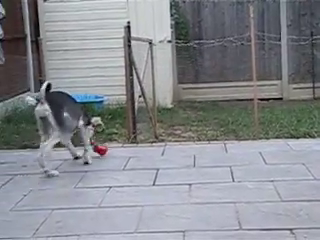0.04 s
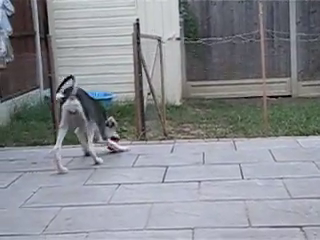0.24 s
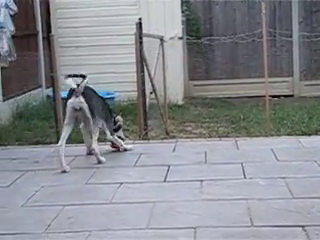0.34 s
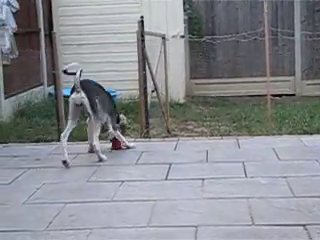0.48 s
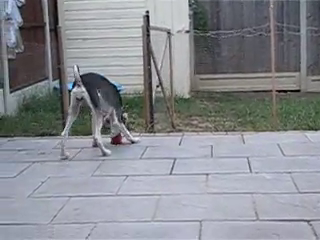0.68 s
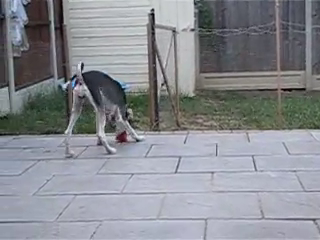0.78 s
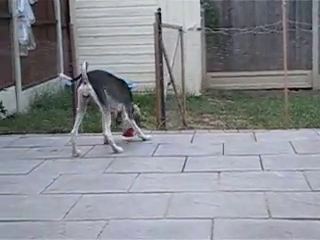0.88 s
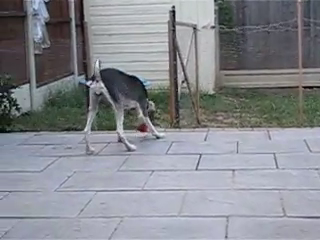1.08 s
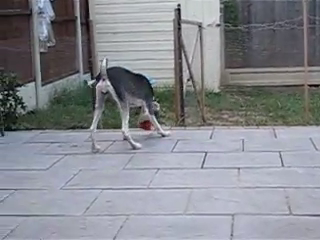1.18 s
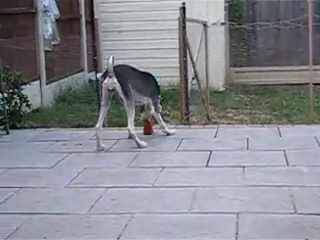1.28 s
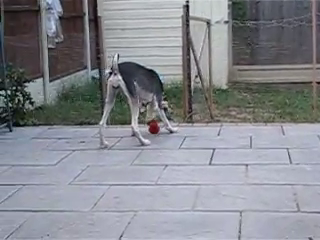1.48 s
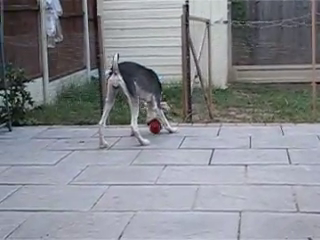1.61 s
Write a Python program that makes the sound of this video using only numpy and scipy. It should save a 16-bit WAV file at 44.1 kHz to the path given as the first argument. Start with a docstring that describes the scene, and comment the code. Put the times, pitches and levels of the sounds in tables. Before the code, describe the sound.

Hollow knocks and short scrapes of a plastic pot pushed over stone by a puppy.

```python
"""Over a quiet outdoor rumble, a distant hum and a camera's faint pulsing whine, a puppy knocks a small
plastic pot over on a paved patio. Each knock is a hollow pop with a crack; claws and grit tick, paws scuff.
Nosed along the slabs, the rim rasps and squeaks and the covered cavity hoots. The rumble swells once,
then at 1.3 s the dropped pot lands on its stiff base and bounces. Nearby walls and the yard answer."""
import sys
import numpy as np
from scipy import signal
from scipy.fft import rfft, irfft, next_fast_len
from scipy.io import wavfile

SR = 44100
rng = np.random.default_rng(int(sys.argv[2]) if len(sys.argv) > 2 else 0)


def file_out(sig):
    """Save sig as 16-bit WAV at sys.argv[1]."""
    # one column per channel
    cols = np.atleast_2d(sig).T
    # limit, then scale
    lim = np.clip(cols, -1, 1)
    pcm = np.round(lim * 32767).astype(np.int16)
    wavfile.write(sys.argv[1], SR, pcm)


N = 72765
T = np.arange(N) / SR
TOP_HZ = 15900

# knocks of the pot on stone; its pitch shifts as the slab or the muzzle covers its mouth
# (time [s], pop [dB], crack [dB], ring [dB], tilt of pop and ring [dB/octave], pitch [semitones])
POT_KNOCKS = [(0.1013, -29.5, -22, -28, 15, -0.39), (0.2299, -11.5, -13, -31, -7, 0.71),
              (0.2342, -19.5, -15.5, -24, 28, 2.26), (0.2379, -20, -15, -10, 12, 1.76),
              (0.2486, -4, -10.5, -5, -7, 0.24), (0.252, -2, -10, -5, -9.5, 0.015),
              (.2562, -6.5, -11, 3, -1.5, -0.081), (0.2614, -7, -11, 2, 1.5, -0.078),
              (.268, -27, -17, -15, -2, -0.07), (0.3606, -10.5, -19, -32, 4.5, -1.2),
              (.402, -23.5, -23.5, -12, 13, -0.34), (.4405, -25, -32, -16, 17, -1.17),
              (.476, -20, -28.5, -16, 7, 1.06), (0.5356, -16, -24.5, -12.5, 5, -0.22),
              (.61, -43, -25, -37, -3, -1.1), (.619, -28, -31, -42, 2, -1.1),
              (.6245, -16, -22, -26, -6, -0.31), (0.6508, -20, -15, -19.5, -10, -0.93),
              (.6722, -35, -19.5, -28, -1, -2), (1.2075, -34.5, -48, -51, 3, -0.37),
              (1.3101, -1, -14.5, -5, 0.5, -0.36), (1.3433, -9.5, -18, -8, 8.5, -0.17),
              (1.3735, -27, -49, -19, 1, 0.36), (1.3935, -15.5, -21.5, -18, 9, -0.33),
              (1.4122, -24, -22, -26, 18, -0.12), (1.4275, -30, -26, -34, 11, 1.1)]
# tone colour of the pot's cavity (frequency [Hz], level [dB])
CAVITY_COLOUR = [(60, -39.5), (200, -30.5), (410, -20), (510, -5), (620, -6), (740, 1), (950, -4.5),
                 (1170, 0), (1370, -23.5), (1700, -29.5), (2300, -46), (8000, -74)]
# tone colour of rubbing on stone (frequency [Hz], level [dB])
RASP_COLOUR = [(200, -10.5), (700, 3.5), (1700, 0), (3000, -1.5), (4300, -2.5), (5600, -7.5), (9000, -18),
               (15500, -34)]
# bright tone colour of claws and grit (frequency [Hz], level [dB])
TICK_COLOUR = [(400, -61), (2000, 0), (4000, 6), (8000, 2.5), (12500, 3.5), (15500, -6)]


def amp(db):
    return 10 ** (np.asarray(db) / 20)


def unit_rms(x):
    return x / np.sqrt(np.mean(x ** 2) + 1e-20)


def curve_at(points, hz):
    """Read (frequency, value) points along a log frequency axis."""
    freqs, values = np.transpose(points)
    return np.interp(np.log(hz + 1), np.log(freqs + 1), values)


def tilted(colour, tilt_db, low_hz, high_hz):
    """Lean a colour by tilt_db an octave between two frequencies."""
    return [(hz, db + tilt_db * np.log2(np.clip(hz, low_hz, high_hz) / low_hz)) for hz, db in colour]


def transposed(rows, semitones):
    """Move a colour or a set of modes in pitch."""
    return [(hz * 2 ** (semitones / 12), *rest) for hz, *rest in rows]


def filtered(x, response):
    """Filter x by a complex gain, given as a function of frequency."""
    size = next_fast_len(N + SR // 2)
    return irfft(rfft(x, size) * response(np.fft.rfftfreq(size, 1 / SR)), size)[..., :x.shape[-1]]


def impulse(colour, size=4096):
    """A minimum-phase pulse of peak 1 with the given colour."""
    cepstrum = irfft(np.log(amp(curve_at(colour, np.fft.rfftfreq(size, 1 / SR)))))
    cepstrum[1:size // 2] *= 2
    cepstrum[size // 2 + 1:] = 0
    pulse = irfft(np.exp(rfft(cepstrum)))
    return pulse / np.abs(pulse).max()


def coloured(pair, colour):
    """EQ two channels without pre-ringing."""
    return signal.fftconvolve(pair, impulse(colour)[None], axes=1)[:, :pair.shape[1]]


def spread(pair):
    """Two unrelated signals become left and right: alike in the bass, wide in the treble."""
    # likeness of left and right (frequency [Hz], correlation [0-1])
    likeness = [(100, 0.99), (700, 0.89), (1300, 0.65), (2500, 0.44), (5000, 0.017), (15000, 0.19)]
    angle = lambda hz: np.arccos(np.clip(curve_at(likeness, hz), -1, 1)) / 2
    mid, side = filtered(pair, lambda hz: np.array([np.cos(angle(hz)), np.sin(angle(hz))]))
    return np.array([mid + side, mid - side])


def add(out, start, x):
    """Mix x in at start seconds."""
    i = max(0, round(start * SR))
    out[:, i:i + x.shape[-1]] += x[..., :max(0, N - i)]


def stroke(start, length, attack_s=0.004, release_t60=0.053):
    """Envelope of a rub: quick attack, hold, release."""
    attack = np.clip((T - start) / attack_s, 0, 1)
    return attack * amp(-60 * np.maximum(T - start - length, 0) / release_t60)


def bump(start, length):
    """Envelope with a flat top and soft edges."""
    return np.exp(-(2 * (T - start) / length - 1) ** 4)


def wavering_tone(hz, width_hz):
    """Noise through one narrow resonance, rms 1."""
    return unit_rms(filtered(rng.standard_normal(N), lambda f: 1 / (1 + ((f - hz) / width_hz) ** 2)))


def friction(colour, scatter_db, slips_per_s=4000):
    """Dense tiny slips of uneven size, rms 1."""
    slips = (rng.random(N) < slips_per_s / SR) * amp(scatter_db * rng.standard_normal(N))
    return unit_rms(coloured(spread(slips * rng.standard_normal((2, N))), colour))


def snap(colour, t60, size=2048, side_db=-1):
    """A burst of noise dying in t60, with the energy of a brief pulse of height 1."""
    noise = spread(rng.standard_normal((2, size)) * amp([[0], [side_db]]))
    burst = coloured(noise * amp(-60 * np.arange(size) / SR / t60), colour)
    return 3.62 * burst / np.linalg.norm(burst)


def ringing(modes, tilt_db=0, pivot_hz=870):
    """Damped sines, struck a little differently each time; tilt_db makes the ring brighter or duller."""
    t = T[:SR // 4]
    return sum(amp(db + tilt_db * np.log2(hz / pivot_hz) + rng.normal(0, 1.6) - 60 * t / t60)
               * np.sin(2 * np.pi * hz * t) for hz, db, t60 in modes)


def outdoor_bed():
    """Outdoor rumble that swells once in the deep bass, and a distant hum."""
    # tone colour of the open air (frequency [Hz], level [dB])
    air_colour = [(15, -46), (25, -2), (133, -1.5), (361, -8), (620, -14.5), (1120, -12.5), (2090, -23),
                  (4100, -29), (8050, -32), (15800, -40.5)]
    air = filtered(spread(rng.standard_normal((2, N))), lambda hz: amp(curve_at(air_colour, hz)))
    swell = amp(-47.5) * bump(start=0.837, length=0.31) * wavering_tone(hz=56, width_hz=22)
    hum = amp(-53.5) * wavering_tone(hz=217.3, width_hz=6.3)
    return amp(-43) * unit_rms(air) + swell + hum


def camera_whine(hz=7890, pulse_hz=30, first_peak_s=0.0148):
    """The camera's thin whine pulses once a picture."""
    gate = np.clip(0.67 + 1.2 * np.cos(2 * np.pi * pulse_hz * (T - first_peak_s)), 0, 1)
    return amp(-62.5) * gate * unit_rms(np.sin(2 * np.pi * hz * T))


def rim_scrapes():
    """The dragged rim rasps on the slabs and rubs the cavity into sound; returns (rasp, rub)."""
    # drags of the rim (time [s], length [s], rasp [dB], hollow rub [dB], rasp tilt [dB/octave])
    drags = [(0, 0.0055, -36.5, -38, 4), (0.008, 0.063, -47, -51.5, 2), (0.225, 0.017, -31.5, -60, 5.5),
             (0.25, 0.016, -31, -19.5, 4), (0.274, 0.054, -53, -46, 9), (0.357, 0.0047, -36.5, -38, 2.5),
             (0.392, 0.006, -33.5, -40, 4.5), (0.426, 0.065, -48, -41.5, -0.5),
             (0.555, 0.082, -39, -47, -2), (0.644, 0.038, -34, -39, -3.5)]
    rasp, rub_envelope = np.zeros((2, N)), np.zeros(N)
    for start, length, rasp_db, rub_db, tilt_db in drags:
        colour = tilted(RASP_COLOUR, tilt_db, low_hz=1510, high_hz=12000)
        envelope = stroke(start, length)
        rasp += amp(rasp_db) * envelope * friction(colour, scatter_db=2.5)
        rub_envelope += amp(rub_db) * envelope
    return rasp, rub_envelope * friction(CAVITY_COLOUR, scatter_db=1)


def hollow_pops():
    """Every knock pops the pot's cavity and leaves its modes ringing."""
    # the pot's lingering modes (frequency [Hz], level [dB], t60 [s])
    pot_modes = [(459.3, -37, 0.17), (524, -28, 0.13), (610, -29, 0.2), (743.6, -24, 0.14),
                 (862, -23.5, 0.15), (1005, -35, 0.068), (1110, -34, 0.069), (1160, -20, 0.082)]
    out = np.zeros((2, N))
    bloom = 1 - np.exp(-T[:SR // 4] / 0.011)
    for start, pop_db, _, ring_db, tilt_db, semitones in POT_KNOCKS:
        colour = tilted(CAVITY_COLOUR, tilt_db, low_hz=464, high_hz=1130)
        add(out, start, amp(pop_db) * impulse(transposed(colour, semitones)))
        add(out, start, amp(ring_db) * bloom * ringing(transposed(pot_modes, semitones), tilt_db))
    return out


def rim_cracks():
    """The rim cracks on stone at every knock, duller when softer."""
    # tone colour of plastic striking stone (frequency [Hz], level [dB])
    crack_colour = [(300, -35), (1100, -3.5), (1700, 4.5), (2400, 0), (3000, -1), (4000, 0), (5300, -5),
                    (6600, -10.5), (9000, -14.5), (15500, -23.5)]
    dulling = 0.23  # dB an octave lost for each dB below the hardest crack
    hardest_db = max(db for _, _, db, *_ in POT_KNOCKS)
    out = np.zeros((2, N))
    for start, _, db, *_ in POT_KNOCKS:
        colour = tilted(crack_colour, dulling * (db - hardest_db), low_hz=3480, high_hz=TOP_HZ)
        add(out, start, amp(db) * snap(colour, t60=0.011))
    return out


def claw_ticks():
    """Claws and grit tick sharply on the stone."""
    # ticks (time [s], level [dB])
    ticks = [(0.1014, -21), (0.107, -26.5), (0.222, -25.5), (0.229, -37), (0.252, -19), (0.4025, -33),
             (0.4867, -28.5), (0.646, -30), (1.2875, -32), (1.3092, -23), (1.335, -27), (1.3466, -29)]
    out = np.zeros((2, N))
    for start, db in ticks:
        add(out, start, amp(db) * snap(TICK_COLOUR, t60=0.0062))
    return out


def paw_scuffs():
    """Paws brush softly over the slabs."""
    # scuffs (time [s], length [s], level [dB])
    scuffs = [(0.122, 0.016, -44), (0.866, 0.033, -47.5), (1.481, 0.047, -45), (1.612, 0.045, -45.5)]
    envelope = sum(amp(db) * stroke(start, length) for start, length, db in scuffs)
    return envelope * friction(RASP_COLOUR, scatter_db=2)


def base_clacks():
    """The pot's stiff base clacks when it meets the slab."""
    # landings on the base (time [s], level [dB])
    landings = [(.2338, -11), (.2612, -9), (1.3101, -5)]
    # the base's brief modes (frequency [Hz], level [dB], t60 [s])
    base_modes = [(2460, -19.5, 0.022), (3700, -19, 0.013), (4057, -13, 0.014), (5190, -17.5, 0.0087)]
    out = np.zeros((2, N))
    for start, db in landings:
        add(out, start, amp(db) * ringing(base_modes))
    return out


def side_tocks(hz=1687, t60=0.027):
    """The thin side flexes as the pot bounces on it: a tock, lower than the clack."""
    # bounces on the side (time [s], level [dB])
    bounces = [(0.2343, -21.5), (1.3431, -23.5), (1.3945, -29)]
    out, t = np.zeros((2, N)), T[:SR // 4]
    for start, db in bounces:
        add(out, start, amp(db - 60 * t / t60) * np.sin(2 * np.pi * hz * t))
    return out


def grit_scratches():
    """Grit under the rim makes thin, bright scratches."""
    # scratches (time [s], length [s], level [dB])
    scratches = [(0.554, 0.0082, -36.5), (0.569, 0.0098, -37.5)]
    envelope = sum(amp(db) * bump(start, length) for start, length, db in scratches)
    return envelope * friction(TICK_COLOUR, scatter_db=4.5)


def rim_squeak():
    """The rim catches once in a tiny squeak."""
    # tone colour of the catch (frequency [Hz], level [dB])
    squeak_colour = [(1300, -43), (2000, -1.5), (2350, 9), (2900, 3.5), (3300, -24.5)]
    return amp(-28.5) * bump(start=0.5555, length=0.011) * friction(squeak_colour, scatter_db=1.5)


def cavity_hoots():
    """Dragged mouth down, the rim sticks and slips, exciting one narrow note of the covered cavity."""
    # hoots (time [s], length [s], level [dB])
    hoots = [(0.647, 0.0069, -27), (0.674, 0.013, -36)]
    envelope = sum(amp(db) * stroke(start, length) for start, length, db in hoots)
    return envelope * wavering_tone(hz=720, width_hz=54)


def with_walls(x, dull_hz=7800):
    """The direct sound and a few quick, slightly dull reflections."""
    # reflections off nearby walls (delay [s], level [dB], right ear's lag [s])
    reflections = [(.00435, -9.5, 0.00012), (.00545, -14.5, 0.00011), (.00925, -11.5, .00006),
                   (0.0104, -17, .00004), (.0243, -19.5, 0.000045)]
    ears = np.array([[-0.5], [0.5]])
    echoes = lambda hz: sum(amp(db) * np.exp(-2j * np.pi * hz * (delay + ears * lag))
                            for delay, db, lag in reflections)
    return filtered(x, lambda hz: 1 + echoes(hz) / (1 + (hz / dull_hz) ** 2))


def yard_reverb(x, build_s, change_s=0.15):
    """Scattered echoes from fences and shed; a fresh pattern every change_s suggests the moving pot."""
    # the yard's decay (frequency [Hz], t60 [s])
    decay_times = [(200, 0.4), (900, 0.46), (3500, 0.46), (8000, 0.37), (15000, 0.24)]
    out, block = np.zeros((2, N)), round(change_s * SR)
    for i in range(0, N, block):
        hz, t, noise = signal.stft(spread(rng.standard_normal((2, SR // 2))), SR, nperseg=256)
        decay = amp(-60 * t / curve_at(decay_times, hz)[:, None])
        build = 1 - np.exp(-t / build_s)
        _, tail = signal.istft(noise * decay * build, SR, nperseg=256)
        tail /= np.linalg.norm(tail[0])
        add(out, i / SR, signal.fftconvolve(x[:, i:i + block], tail, axes=1))
    return out


def scene():
    """The mix leans a little left; the crisp layers get more reverb than the pot's body."""
    rasp, rub = rim_scrapes()
    body = rub + hollow_pops() + base_clacks() + side_tocks() + cavity_hoots()
    crisp = rasp + rim_cracks() + claw_ticks() + paw_scuffs() + grit_scratches() + rim_squeak()
    reverb = amp(-14) * yard_reverb(body, build_s=0.0097) + amp(-9) * yard_reverb(crisp, build_s=0.011)
    balance = amp([[0.24], [-0.24]])
    return (with_walls(body + crisp) + reverb + outdoor_bed() + camera_whine()) * balance


def record(dry):
    """Soft clipping rounds off the loudest peaks; everything above TOP_HZ is cut."""
    ceiling = 0.97
    rounded = dry / (1 + np.abs(dry / ceiling) ** 12) ** (1 / 12)
    return filtered(rounded, lambda hz: hz < TOP_HZ)


dry = scene()
out = record(dry)
file_out(out)
```